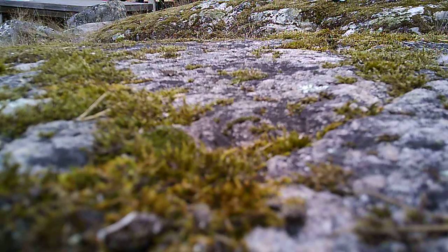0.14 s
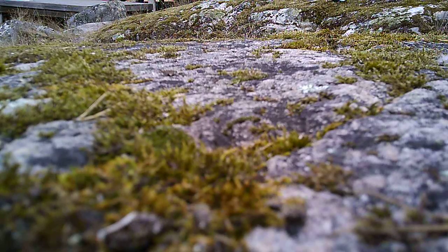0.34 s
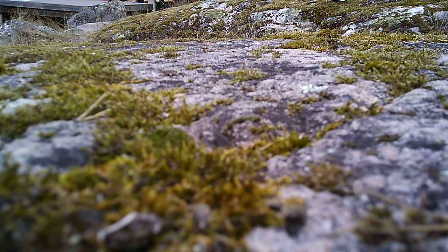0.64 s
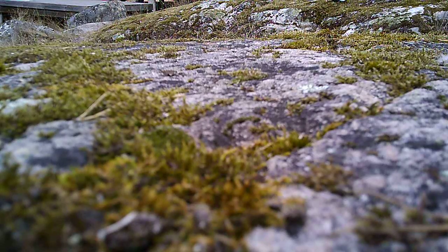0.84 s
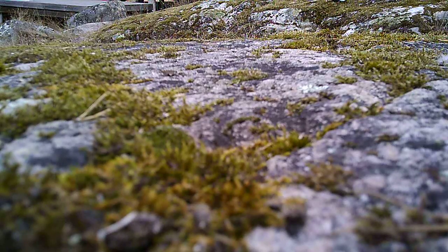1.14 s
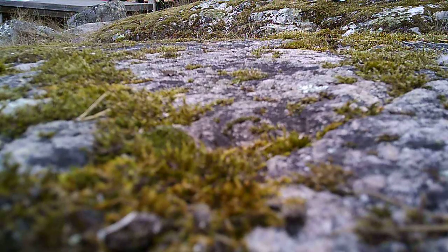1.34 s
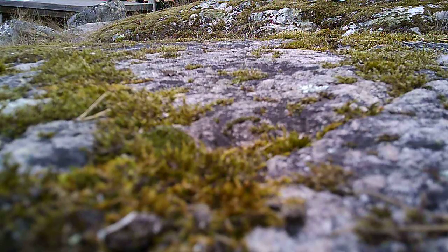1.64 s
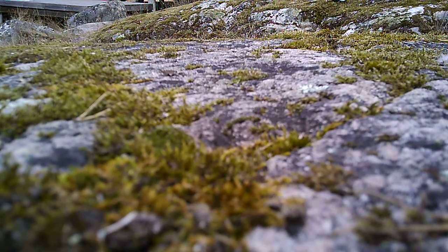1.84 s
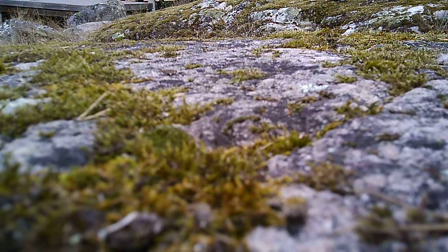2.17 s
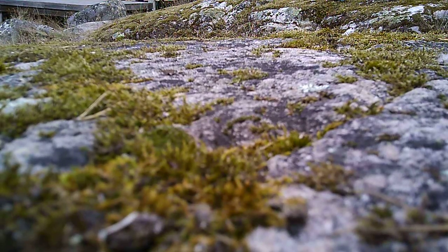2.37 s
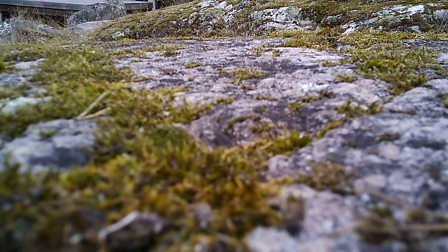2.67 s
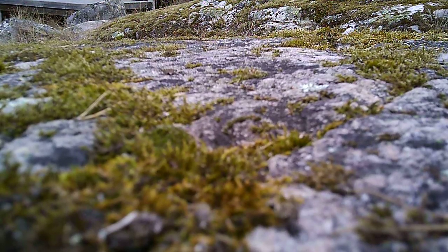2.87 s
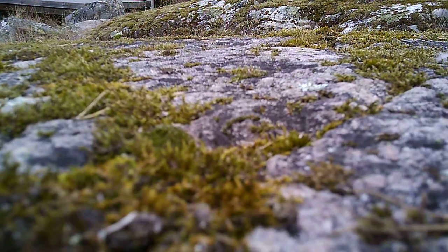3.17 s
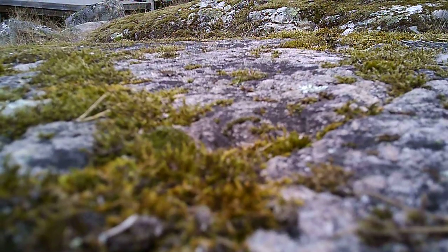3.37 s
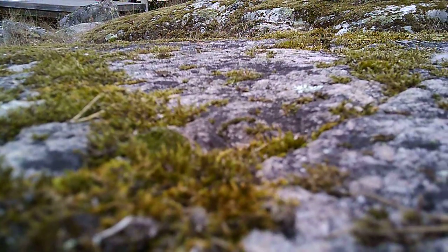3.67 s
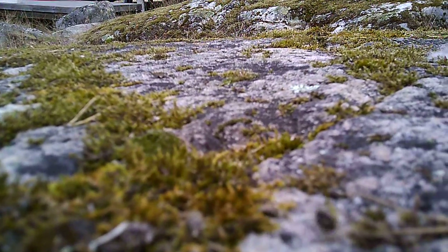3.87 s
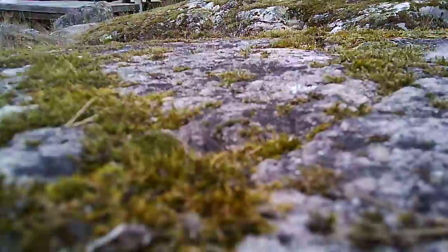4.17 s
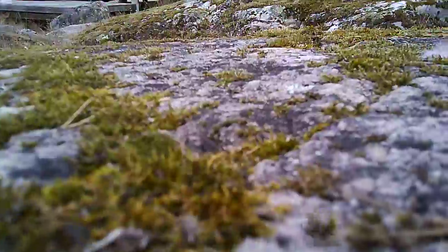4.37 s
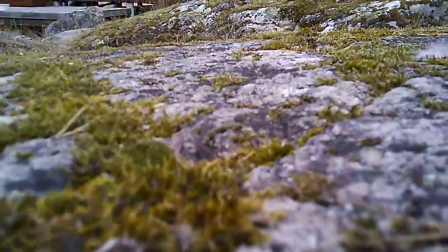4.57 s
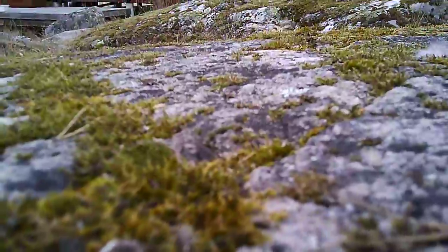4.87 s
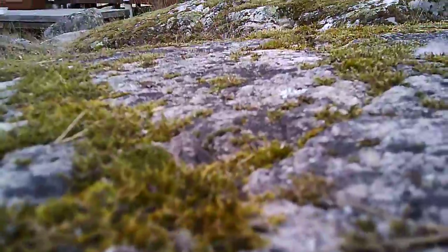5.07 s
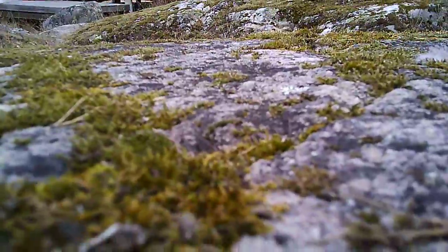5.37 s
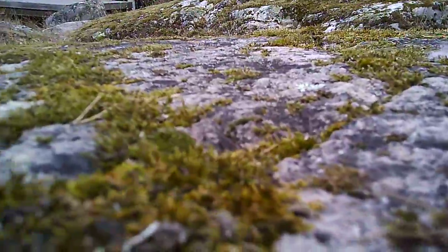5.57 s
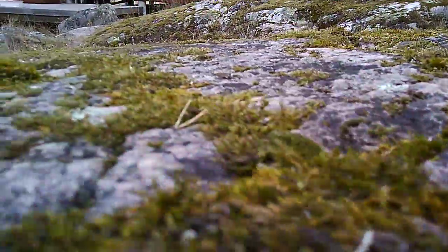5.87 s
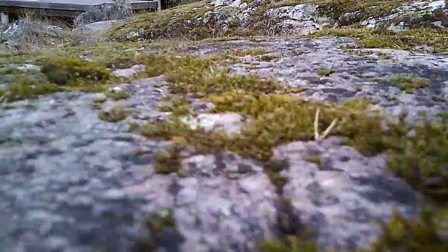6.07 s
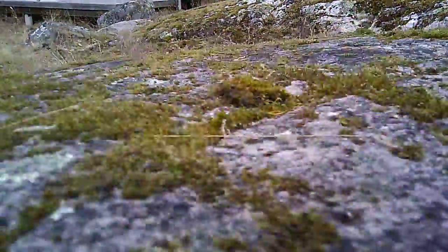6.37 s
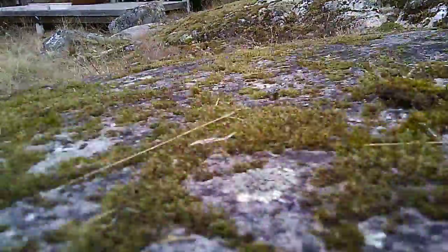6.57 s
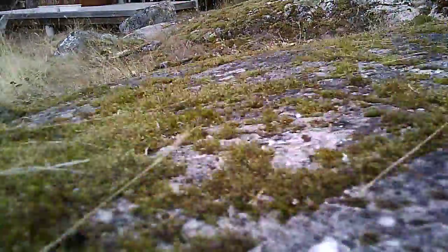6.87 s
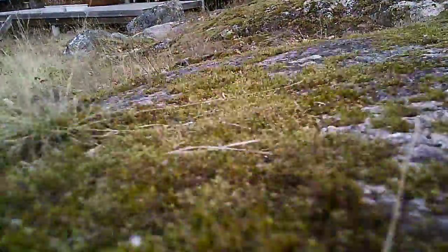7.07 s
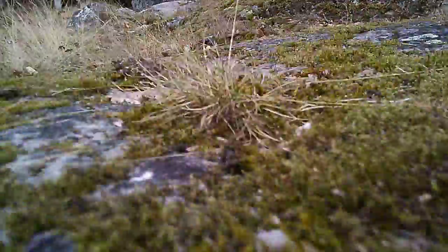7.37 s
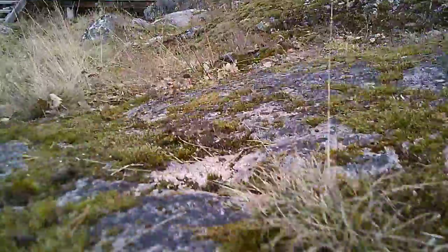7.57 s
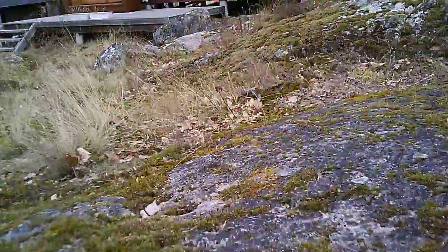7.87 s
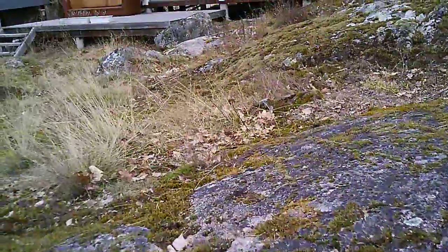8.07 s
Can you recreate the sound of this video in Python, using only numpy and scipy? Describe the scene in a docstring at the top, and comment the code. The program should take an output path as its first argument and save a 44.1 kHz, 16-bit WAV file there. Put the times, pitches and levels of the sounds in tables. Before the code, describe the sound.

Nearly two seconds of quiet electronic ticking, faint whistling and low hum outdoors, then a click and thump as four small geared motors start. They stumble, rattle and climb to a harsh, clashing whine, so close that the microphone overloads. Air thumps and hisses around it. The motors strain on the rock, a hollow moan rises, and the craft lifts away, whining higher and less steadily to the end.

```python
"""A small geared quadcopter, heard by the microphone it carries, rests on a rock, spins up and lifts off.
At rest its electronics tick and whistle as noise bursts and steady sines over a low beating hum; a far bird,
a gliding sine, chirps once. Then the motor drive squeals and a jolt, a sine pulse and a click, starts four motors
whose harmonics ring the resonant frame. Filtered noise gives rattle, propeller hiss and buffeting, the input clips,
and a wavering moan swells just before the craft lifts off and flies."""
import sys
import numpy as np
from scipy import signal
from scipy.fft import rfft, irfft
from scipy.io import wavfile
from scipy.ndimage import uniform_filter1d

SR = 44100
rng = np.random.default_rng(int(sys.argv[2]) if len(sys.argv) > 2 else 0)


def wrap_up_sound(samples):
    """Save the sound to the file named by the first command line argument, as 16-bit audio."""
    columns = np.atleast_2d(samples).T
    # keep every value between -1 and 1, then stretch to whole-number steps
    tamed = np.clip(columns, -1, 1)
    steps = np.round(tamed * 32767).astype(np.int16)
    wavfile.write(sys.argv[1], SR, steps)


N = 362502
T = np.arange(N) / SR  # time, s
START_S = 1.8355
AGE = np.maximum(T - START_S, 0)  # seconds since the motors were switched on

# Motor tones as multiples of shaft speed: 3, 6 and 12 are magnetic ripple; 8, 16 and 24 are gear mesh.
SHAFT_MULTIPLES = [1.5, 2, 3, 4, 6, 8, 9, 10, 11, 12, 14, 16, 24]
# Relative level of each of those tones [dB], in the fast pair, whose gears sing, and in the slow pair.
FAST_PAIR_DB = [-20.5, -17, -3.5, -15, -31, -1, -10, -19, -7, -13, -11.5, -0.5, -1.5]
SLOW_PAIR_DB = [-17, -13, -1.5, -9, -5.5, -3.5, -5, -8, -9, -6, -14, -15, -16]
# Resonances of the frame. Each row: frequency in Hz, bandwidth in Hz, peak gain in dB.
FRAME_MODES = [(520, 230, 1), (757, 75, 5.5), (1210, 650, -1.5), (3103, 150, 7), (3770, 390, 3.5),
               (5090, 890, 3.5), (6000, 270, 7), (7020, 600, 7)]
# Speed asked of the four motors before holding back and trim. Each row: time in s, shaft speed in Hz.
THROTTLE_CURVE = [(2.6, 377), (2.8, 397), (3.02, 419), (3.28, 428), (3.43, 461), (3.95, 446), (4.17, 458),
                  (4.7, 460), (5.3, 465), (5.6, 476), (5.9, 480), (6.3, 514), (6.85, 499), (7.3, 512),
                  (7.48, 508), (7.62, 548), (8.03, 501), (8.22, 520)]
# On the sloping rock one pair is held back to level the body. Each row: time in s, Hz under the throttle.
HOLD_BACK_CURVE = [(2.6, 35), (2.9, 40), (3.28, 61), (3.47, 102), (3.95, 92), (4.75, 104), (5.15, 82),
                   (5.42, 80), (5.8, 0)]
# The start of each motor (lead, partner, shaky, slowest). Each row: overshoot time in s, overshoot speed in Hz,
# time at idle in s, idle speed in Hz, time the climb begins in s.
MOTOR_STARTS = [(1.93, 262, 2.03, 232, 2.06), (1.96, 385, 2.07, 260, 2.35), (1.97, 347, 2.04, 200, 2.26),
                (1.93, 270, 2.0, 222, 2.24)]
# The same four motors. Each row: speed trim on the ground in Hz, in flight in Hz, relative whine level in the
# run-up in dB, on the ground in dB, in flight in dB, relative shaft imbalance in dB, relative blade thrum in dB.
MOTOR_SETTINGS = [(0, 1, -8.5, -12.5, -12.5, -13, -20), (-4, 14, -14.5, -15.5, -12, -9.5, -16.5),
                  (0, -11, -16, -16.5, -11, 1, -23), (-4, -49, -15, -28, -14.5, -3, -18)]
# Brief pushes that keep the balance. Each row: centre in s, half length in s, then Hz added to each motor.
BALANCE_PUSHES = [(2.089, 0.049, -6, -26, 0, 10), (2.191, .045, 0, 0, 0.5, 44),
                  (4.908, 0.088, 18, 16, -3, -8), (5.421, 0.072, 24, 17, 0, 0),
                  (5.659, 0.026, 10, 38, 0, 8), (5.723, .025, -13, -5, 12, 8), (5.793, .03, 0, 4, 22, 28.5),
                  (5.88, .035, -22, -20, -6, 10), (5.97, .035, 0, 38, 0, 0), (6.12, 0.028, 0, 14, 0, 0),
                  (6.351, 0.046, -3, 22, -10, -14), (6.451, .035, 0, 0, 11.5, 8),
                  (6.718, 0.059, 14, -16, 0, 0), (6.971, .06, 6, 20, -6, 4),
                  (7.391, 0.042, 56, -52, -30, 44.5), (7.449, .02, 18, -25, 22, -0.5),
                  (7.526, 0.024, 66, -15, -12, 0), (7.583, .035, 0, 0, 15.5, 10)]
# Strength of the gear mesh tones. Each row: time in s, relative level in dB.
MESH_CURVE = [(1.92, -20), (2.12, -9), (2.55, -6.5), (2.8, -11), (3.45, 0.5), (4.3, 2), (5.2, -2),
              (6.25, 3), (6.7, -0.5), (7.38, 1.5), (8.22, -3)]
# Spectrum of the propeller hiss. Each row: frequency in Hz, relative density in dB.
WASH_COLOUR = [(60, -1), (150, -4.5), (290, -4), (410, 1), (560, -1), (800, -1), (1500, -4), (2400, -3),
               (3100, -1), (4100, 2), (5900, 2), (6700, -3), (7800, -2.5), (9500, -11.5), (15500, -16.5)]
# Spectrum of the air that buffets the microphone. Each row: frequency in Hz, relative density in dB.
BUFFET_COLOUR = [(10, -12), (25, 4.5), (45, 2), (80, -4), (130, -9.5), (220, -15), (500, -32), (1500, -62)]
# Downwash that tumbles over the microphone. Each row: centre in s, half length in s, relative level in dB.
GUSTS = [(2.28, 0.022, -8), (2.686, 0.13, 0), (3.017, .025, -5.5), (3.18, .08, -13), (3.974, 0.2, -2),
         (4.375, 0.22, -3.5), (4.804, .03, -4), (5.08, 0.063, -1.5), (5.685, .06, -12), (6.334, 0.063, -4),
         (7.252, 0.31, -11), (7.802, 0.065, -11)]
# Spectrum of the body rattle. Each row: frequency in Hz, relative density in dB.
RATTLE_COLOUR = [(150, -20), (420, -2), (750, -4.5), (1100, 4.5), (1450, -10), (1950, -3), (2500, -41),
                 (6000, -45)]
# Steady tones of the hum at rest. Each row: frequency in Hz, rms level before the input gain in dB.
HUM_TONES = [(40.8, -42), (47.5, -45), (81.6, -62)]
# Steady whistles of the electronics. Each row: frequency in Hz, rms level before the input gain in dB.
WHISTLE_TONES = [(1437, -73), (4253, -77), (4280, -63.5), (5685, -69), (7730, -81), (8533, -71),
                 (9970, -81), (11375, -73), (12812, -75)]
# Spectrum of the electronic ticks. Each row: frequency in Hz, relative density in dB.
TICK_COLOUR = [(2500, -26), (3700, -8), (4300, 6), (4550, -1), (4860, 4), (5200, -8), (5800, -5),
               (6500, -19), (7750, 5.5), (8400, -11), (10000, -11), (11300, -2), (13000, -4), (15500, -13)]
# Spectrum of the still air. Each row: frequency in Hz, relative density in dB.
AIR_COLOUR = [(10, 6), (20, 13.5), (45, -0.5), (80, -5), (130, -12.5), (200, -15), (450, -22), (700, -28.5),
              (1500, -32), (2400, -36), (4200, -31), (6500, -39.5), (12000, -42), (15500, -49)]

RUN_UP_ENDS_S = (3.25, 3)  # two times in s about which the run-up gives way to pulling on the ground
LIFT_OFF_S = (5.1, 5.95)  # lift-off glide: from s, to s
HOVER_HZ = 448  # shaft speed that carries the weight
# Hunting as a share of speed: while the motors catch, once they run true, in flight; then the slow sway
CATCH_HUNT, TRUE_HUNT, FLIGHT_HUNT, GROUND_SWAY, FLIGHT_SWAY = .075, 0.00099, 0.001983, .002, .008
LOCK_S = (1.97, 2.09)  # the first hunting dies away: from s, to s
HOLD_BACK_WANDER_HZ = 4  # the held-back pair never quite settles on the ground
# Whine and hiss start this far down and build up with these time constants
WHINE_RISE_DB, WHINE_RISE_S = 18, 0.1
WASH_DB, WASH_RISE_DB, WASH_RISE_S = -3, 35, 0.092
# Buffeting in the run-up, on the ground and in flight, and its chance swings
BUFFET_DB, BUFFET_SWING_DB = (-9, -12.5, -15.5), 1.5
RATTLE_DB, RATTLE_RISE_DB, RATTLE_RISE_S, RATTLE_FADE_DB_PER_S, RATTLE_LATE_DB = -7, 14.5, 0.089, 21.5, -32
SQUEAL_HZ, SQUEAL_START_DB, SQUEAL_LATE_DB, SQUEAL_SETTLE_S = 3672.3, -10.5, -19.5, 0.98
TICK_HZ, AIR_DB = 29.3, -38
TOP_HZ = 15700  # treble limit of the input


def drone():
    """Superposition: rotors, chopped air, rattling body and squealing drive add, all switched on at once."""
    rotors = four_rotors()
    whine = sum(sound for sound, _ in rotors)
    blades = [blade for _, blade in rotors]
    switch = np.clip((T - START_S) * SR / 16, 0, 1)  # ramp of 16 samples
    return (whine + hiss(blades) + downwash() + rattle() + squeal() + kick() + moan()) * switch


def four_rotors(strain_db_per_hz=0.14, swing_db=1.0):
    """Load and loudness: one pair is held back until lift-off; a motor pushed faster whines louder."""
    held_hz = curve(HOLD_BACK_CURVE) + HOLD_BACK_WANDER_HZ * by_stage(1, 1, 0) * walk(7)
    throttle_hz = curve(THROTTLE_CURVE)
    fast = (throttle_hz, FAST_PAIR_DB)
    slow = (throttle_hz - held_hz, SLOW_PAIR_DB)
    pushes = sum(np.outer(hz, swell(at_s, half_s)) for at_s, half_s, *hz in BALANCE_PUSHES)
    rotors = []
    for pair, motor, start, push_hz in zip([fast, fast, slow, slow], MOTOR_SETTINGS, MOTOR_STARTS, pushes):
        pair_hz, tones_db = pair
        ground_hz, flight_hz, run_up_db, ground_db, flight_db, imbalance_db, blade_db = motor
        command_hz = pair_hz + by_stage(ground_hz, ground_hz, flight_hz)
        shaft_hz = shaft_speed(command_hz, start, push_hz)
        load_db = by_stage(run_up_db, ground_db, flight_db) + strain_db_per_hz * push_hz + swing_db * walk(9)
        rotors.append(rotor(shaft_hz, tones_db, load_db, imbalance_db, blade_db))
    return rotors


def rotor(shaft_hz, tones_db, load_db, imbalance_db, blade_db, flutter_db=2.0, wobble=0.37):
    """Harmonics of rotation: motor and gear tones are multiples of shaft speed; also gives the blade phase."""
    shaft = angle(shaft_hz)
    blade = shaft / 4
    load = undb(load_db - WHINE_RISE_DB * settle(WHINE_RISE_S))
    mesh = undb(curve(MESH_CURVE))
    # The big gear runs slightly off centre: phase modulation sets sidebands round the high tones
    runout = wobble * np.sin(blade / 2)
    whine = undb(imbalance_db + 0.98 * walk(13)) * frame_gain(shaft_hz) * np.sin(shaft)
    for multiple, db in zip(SHAFT_MULTIPLES, tones_db):
        teeth = multiple / 8  # whole for gear mesh tones
        size = undb(db + flutter_db * walk(25)) * frame_gain(multiple * shaft_hz)
        if teeth % 1 == 0:
            size = size * mesh
        whine = whine + size * np.sin(multiple * shaft + teeth * runout)
    # Blade thrum grows with thrust, the square of the speed
    thrust = (shaft_hz / HOVER_HZ) ** 2
    blade_tone = np.sin(blade) + undb(-17.5) * np.sin(2 * blade)
    thrum = thrust * blade_tone * undb(2 * walk(12))
    return load * whine + undb(blade_db) * thrum, blade


def shaft_speed(command_hz, start, push_hz, first_hz=160):
    """Speed control: a motor catches, overshoots, idles and climbs to its command, hunting and swaying."""
    over_s, over_hz, idle_s, idle_hz, climb_s = start
    starting = np.interp(T, [START_S, over_s, idle_s], [first_hz, over_hz, idle_hz])
    governed = np.interp(T, [climb_s, THROTTLE_CURVE[0][0]], [0, 1])
    hz = starting + governed * (command_hz - starting) + push_hz
    hunt = CATCH_HUNT * np.interp(T, LOCK_S, [1, 0]) + by_stage(TRUE_HUNT, TRUE_HUNT, FLIGHT_HUNT)
    sway = by_stage(GROUND_SWAY, GROUND_SWAY, FLIGHT_SWAY)
    return hz * (1 + hunt * walk(60) + sway * walk(14))


def frame_gain(hz, top_hz=8050):
    """Resonance: frame modes amplify a tone gliding through them; the shell damps all above top_hz."""
    grid = np.geomspace(20, SR / 2, num=2000)
    power = 0
    for mode_hz, width_hz, db in FRAME_MODES:
        detuning = (grid ** 2 - mode_hz ** 2) / (grid * width_hz)
        power = power + undb(db) ** 2 / (1 + detuning ** 2)
    shell = 1 / (1 + (grid / top_hz) ** 50)
    return np.interp(hz, grid, np.sqrt(power * shell))


def hiss(blades):
    """Amplitude modulation: broadband propeller noise swells each time a blade sweeps past an arm."""
    chop = 1 + 0.12 * sum(np.cos(blade) for blade in blades)
    return noise(WASH_COLOUR) * chop * undb(WASH_DB - WASH_RISE_DB * settle(WASH_RISE_S) + .5 * walk(18))


def downwash(rise_db=22, rise_s=.25, flicker_db=2.14):
    """Turbulence: air builds up under the propellers and buffets the microphone, with gusts off the rock."""
    steady = undb(by_stage(*BUFFET_DB) - rise_db * settle(rise_s) + BUFFET_SWING_DB * walk(9))
    gusts = sum(undb(db) * swell(at_s, half_s) for at_s, half_s, db in GUSTS)
    return noise(BUFFET_COLOUR) * np.hypot(steady, gusts) * undb(flicker_db * walk(18))


def rattle():
    """Broadband vibration: body noise swells, then fades as the motors smooth out."""
    fading_db = np.maximum(RATTLE_DB - RATTLE_FADE_DB_PER_S * AGE, RATTLE_LATE_DB)
    level_db = fading_db - RATTLE_RISE_DB * settle(RATTLE_RISE_S)
    return noise(RATTLE_COLOUR) * undb(level_db + 1.3 * walk(45))


def squeal():
    """Electrical excitation: the drive sounds a fixed tone, strongest under the starting current."""
    level_db = SQUEAL_LATE_DB + (SQUEAL_START_DB - SQUEAL_LATE_DB) * settle(SQUEAL_SETTLE_S)
    return np.sqrt(2) * undb(level_db + 0.65 * walk(30)) * np.sin(2 * np.pi * SQUEAL_HZ * T)


def kick(ring_hz=108, peak_s=0.024, width_s=0.011, db=-5, snap_db=-8, snap_s=0.0016):
    """Impulse response: starting torque snaps the gears tight and shakes the body for a few cycles."""
    shake = undb(db) * swell(START_S + peak_s, width_s) * np.sin(2 * np.pi * ring_hz * AGE)
    return shake + undb(snap_db) * settle(snap_s) * noise(WASH_COLOUR)


def moan(at_s=4.9, half_s=0.72, hz=422, waver_hz=14, db=-19):
    """Frequency modulation: a hollow tone of wavering pitch swells just before lift-off."""
    return undb(db + 3.3 * walk(20)) * swell(at_s, half_s) * np.sin(angle(hz + waver_hz * walk(30)))


def standby():
    """Superposition at rest: beating hum, steady whistles, ticking electronics and still air."""
    return tones(HUM_TONES) + tones(WHISTLE_TONES) + ticks() + noise(AIR_COLOUR) * undb(AIR_DB)


def ticks(db=-50.0, half_s=0.0037, first_s=0.009):
    """Periodic excitation: the electronics fizz in a short noise burst once per camera frame."""
    offset_s = (((T - first_s) * TICK_HZ + .5) % 1 - .5) / TICK_HZ  # from the nearest burst centre
    fizz = noise(TICK_COLOUR)
    # Half of each burst is the same every time, which makes the ticks ring
    repeated = fizz[np.round(offset_s * SR).astype(int)]
    burst = np.exp(-(offset_s / half_s) ** 2)
    return (fizz + repeated) / np.sqrt(2) * burst * undb(db)


def bird(at_s=1.66, length_s=0.0223, hz=4250, glide_hz_per_s=9000, db=-51):
    """Gliding tone: one faint rising chirp, as of a far bird."""
    age = T - at_s
    pitch = hz + glide_hz_per_s * np.clip(age, -2 * length_s, 2 * length_s)
    return undb(db) * swell(at_s, length_s) * np.sin(angle(pitch))


def undb(db):
    """Logarithmic level: decibels to amplitude gain."""
    return 10 ** (np.asarray(db) / 20)


def curve(rows):
    """Linear interpolation: the second column of a table over the times in its first."""
    time_s, value = np.transpose(rows)
    return np.interp(T, time_s, value)


def by_stage(run_up, ground, flight):
    """Piecewise values: the run-up gives way to pulling on the ground, which glides into flight."""
    return np.interp(T, [*RUN_UP_ENDS_S, *LIFT_OFF_S], [run_up, ground, ground, flight])


def settle(time_s):
    """Exponential relaxation: falls from 1 towards 0 after the motors start."""
    return np.exp(-AGE / time_s)


def swell(at_s, half_s):
    """Gaussian envelope: a smooth bump of height 1."""
    return np.exp(-((T - at_s) / half_s) ** 2)


def walk(rate):
    """Random modulation: smooth chance of spread 1 that changes about rate times a second."""
    hold = max(int(SR / rate), 2)
    steps = np.repeat(rng.standard_normal(N // hold + 1), hold)
    x = uniform_filter1d(steps, hold)[:N]
    return x / x.std()


def angle(hz):
    """Phase is the integral of frequency, here from a random start."""
    return 2 * np.pi * (np.cumsum(hz) / SR + rng.random())


def tones(rows):
    """Superposition of steady sines from rows of frequency and rms level."""
    return sum(np.sqrt(2) * undb(db) * np.sin(2 * np.pi * (hz * T + rng.random())) for hz, db in rows)


def noise(colour):
    """Spectral shaping: filtered white noise of rms 1, its spectrum joined over log frequency."""
    hz, db = np.transpose(colour)
    bins = np.maximum(np.arange(N // 2 + 1) * SR / N, 1)
    gain = undb(np.interp(np.log(bins), np.log(hz), db))
    x = irfft(rfft(rng.standard_normal(N)) * gain, N)
    return x / x.std()


def scene():
    """Coincident pickup: the microphone rides on the drone, so both channels are alike."""
    return np.tile(drone() + standby() + bird(), (2, 1))


def record(dry, ceiling=0.7, drive_db=2.0, low_cut_hz=12):
    """Overload: the input clips hard, a coupling filter tilts the flat tops, and the treble is cut."""
    clipped = np.clip(dry * undb(drive_db), -ceiling, ceiling)
    coupling = signal.butter(1, low_cut_hz, "high", fs=SR, output="sos")
    coupled = signal.sosfilt(coupling, clipped)
    treble_cut = signal.firwin(301, TOP_HZ, fs=SR)
    return signal.fftconvolve(coupled, treble_cut[None], "same", axes=1)


dry = scene()
out = record(dry)
wrap_up_sound(out)
```